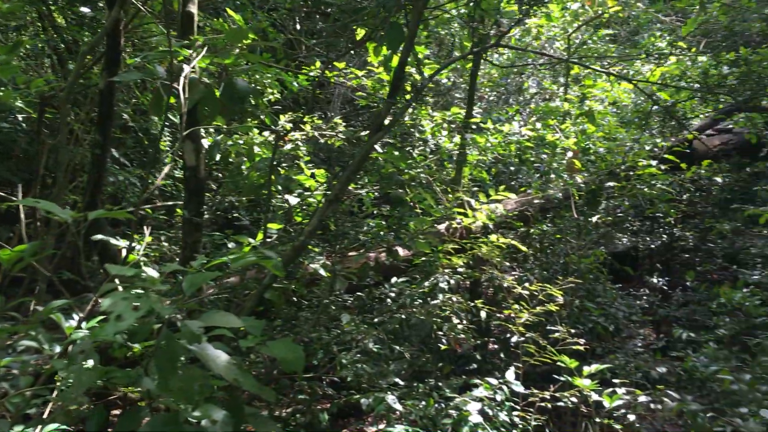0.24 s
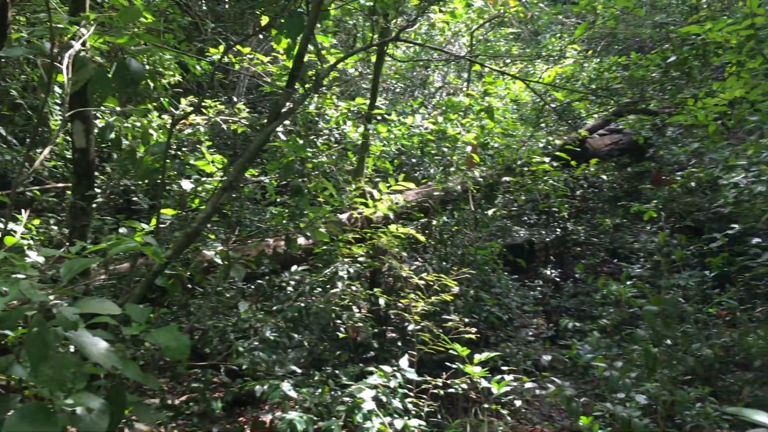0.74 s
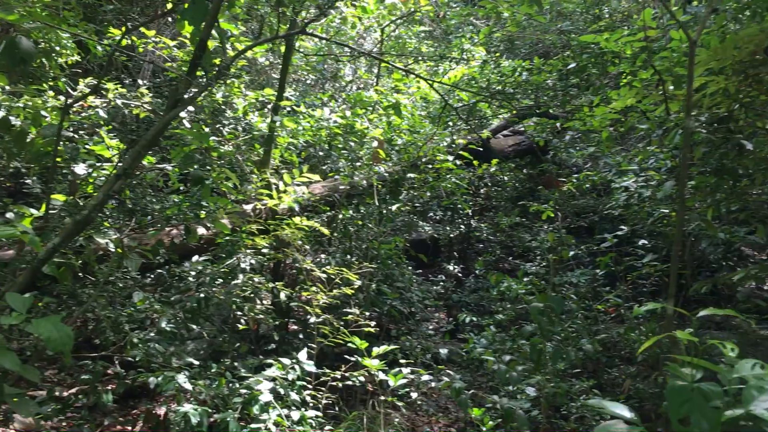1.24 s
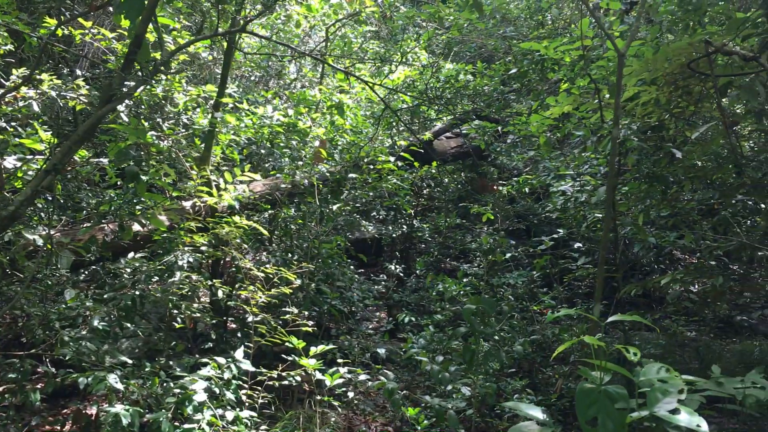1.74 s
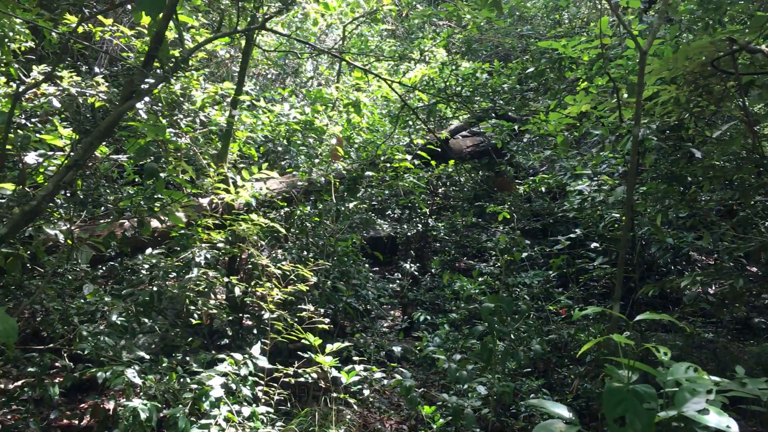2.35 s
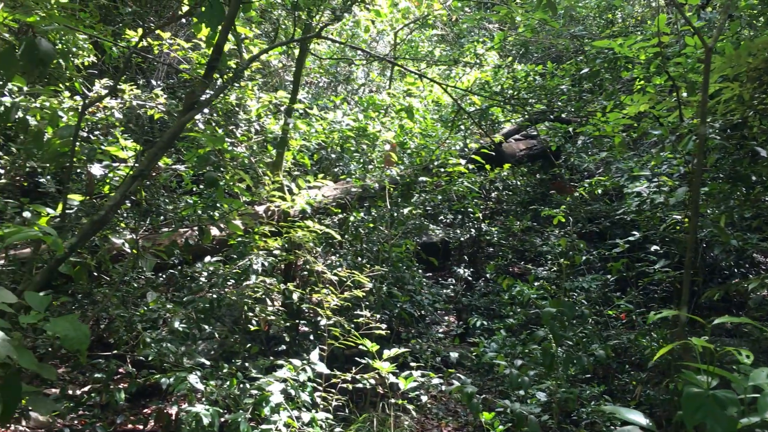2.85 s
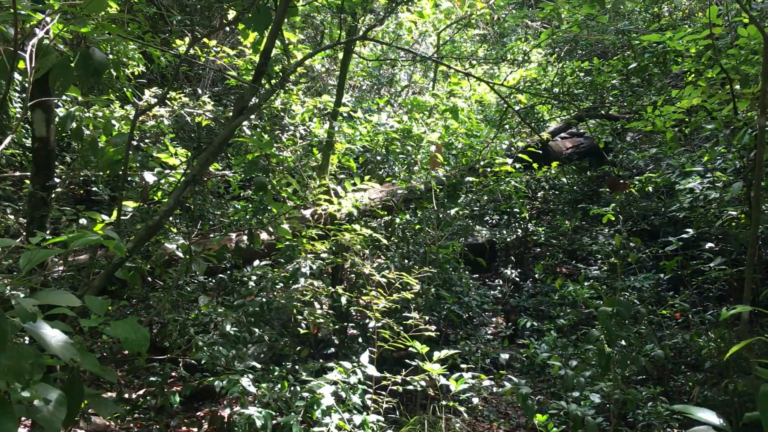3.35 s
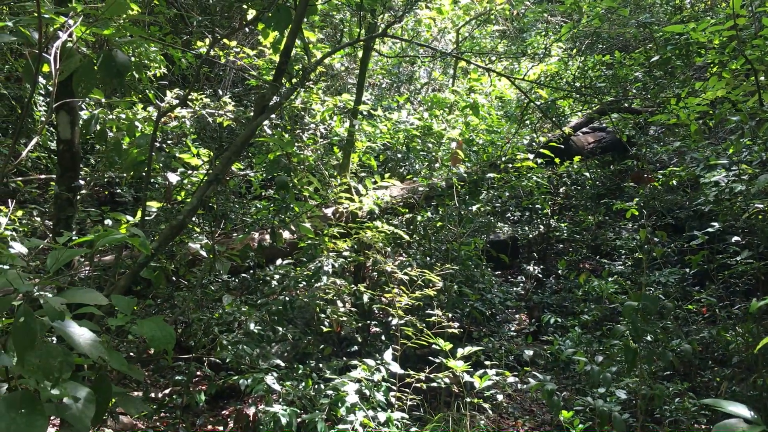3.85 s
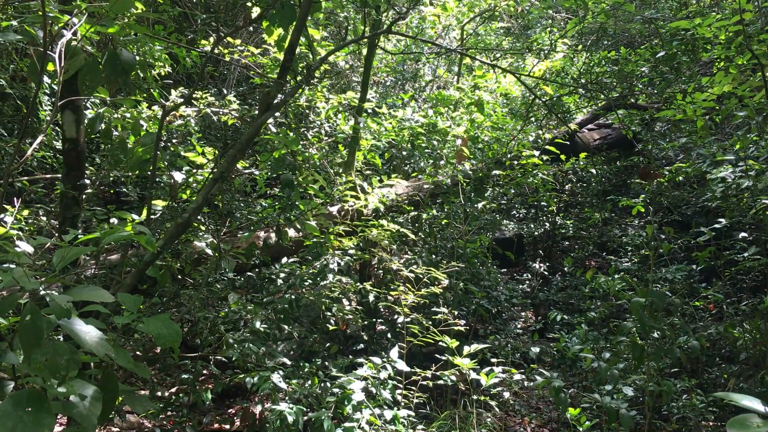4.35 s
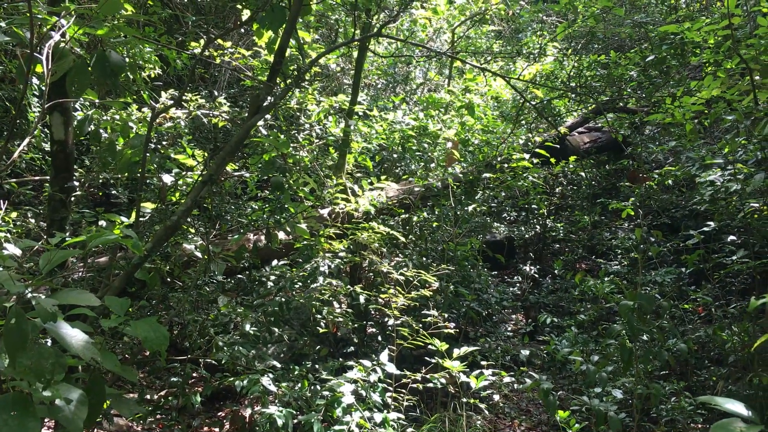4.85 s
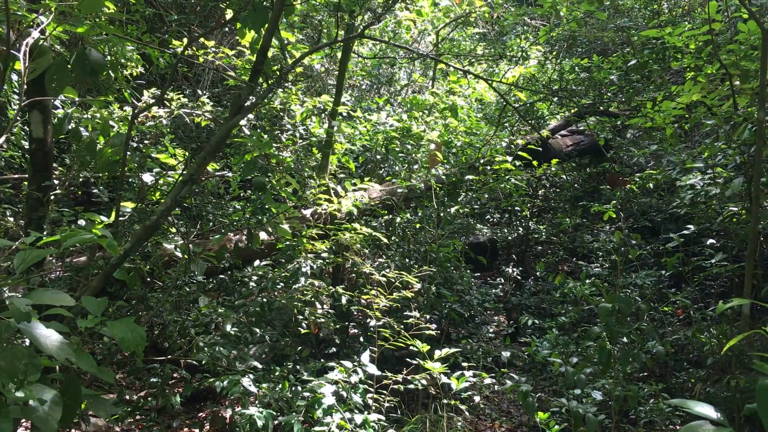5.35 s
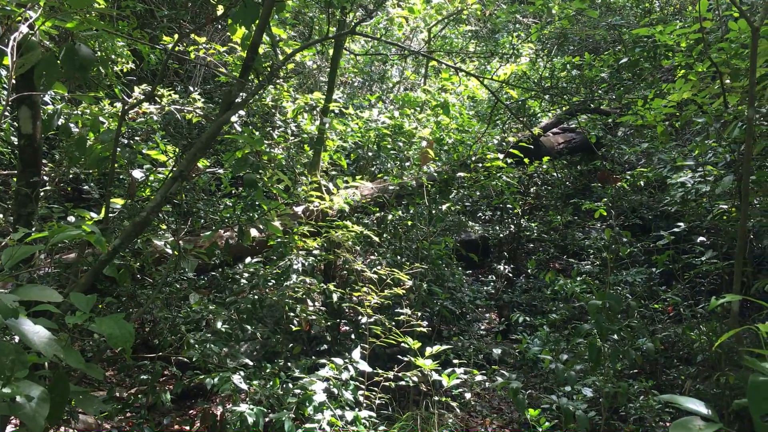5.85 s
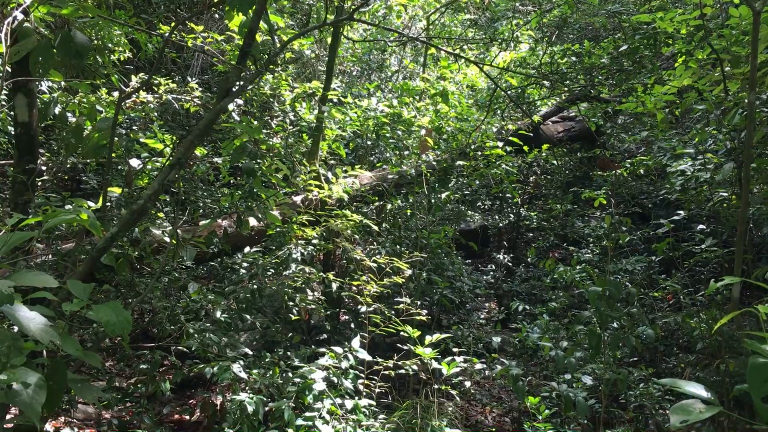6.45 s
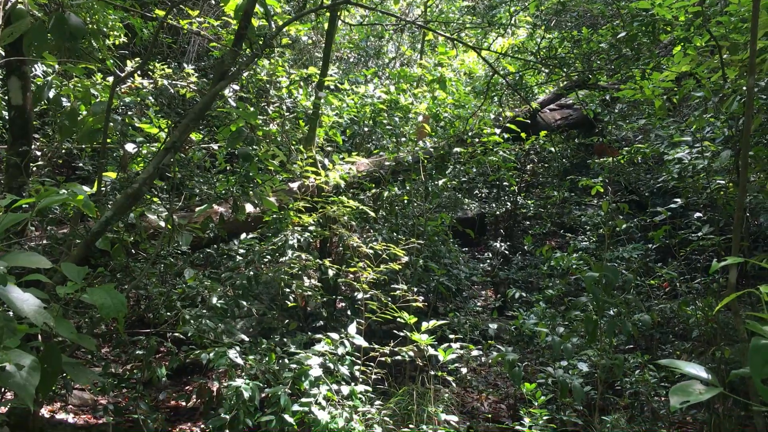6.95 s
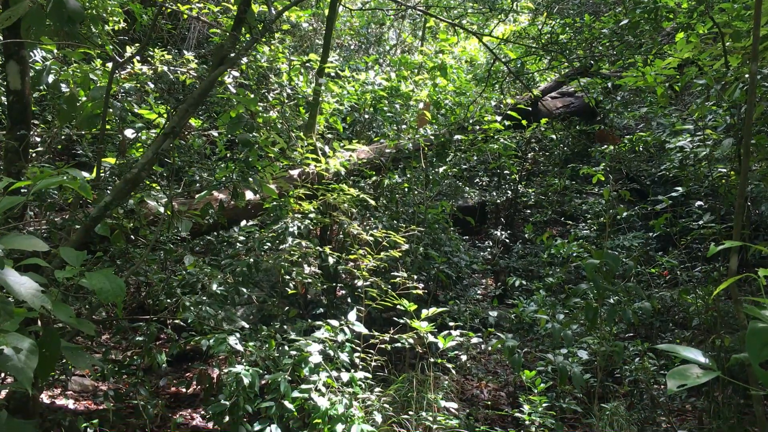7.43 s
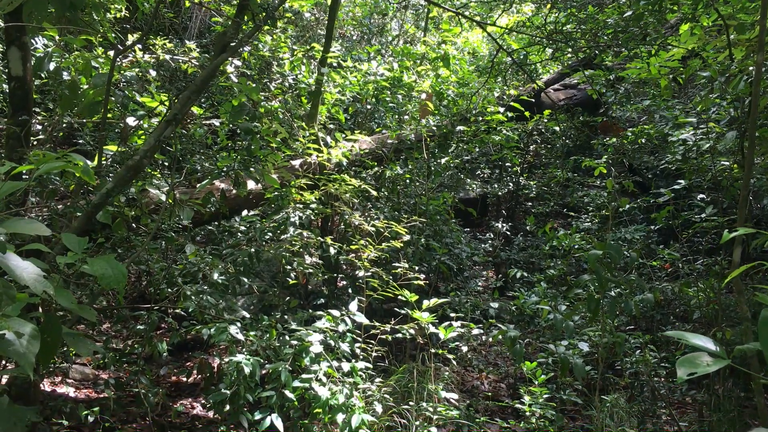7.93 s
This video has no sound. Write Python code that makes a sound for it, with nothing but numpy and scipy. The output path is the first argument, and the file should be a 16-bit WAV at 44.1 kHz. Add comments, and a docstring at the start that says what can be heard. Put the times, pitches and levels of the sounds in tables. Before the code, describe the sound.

In dense sunlit forest, cicadas hold a constant high, fine-grained sizzle with a quick shallow throb. Beneath lie a soft distant roar and low rumble. Faint rasping chips and soft pips from far birds come early, then thin gliding whistles, more frequent toward the end. A few dry twig ticks sound close by. The hand-held mono microphone catches low air buffeting that eases after about two seconds.

```python
"""A forest, heard through a hand-held mono microphone for about eight seconds.
From the start cicadas drone high, some throbbing ten times a second, as click trains through a body spectrum.
Noise bands make the far roar, low rumble, stirring leaves and the air on the microphone, which eases near 1.7 s.
Soon far birds join: rasping noise puffs, soft sine pips, then gliding whistles with an octave; twigs tick nearby.
The octave grows around 5.1 s as the whistling bird turns to face us; the leaves come to rest around 6.6 s."""
import sys
import numpy as np
from scipy import signal
from scipy.fft import rfft, irfft
from scipy.io import wavfile
from scipy.ndimage import uniform_filter1d

SR = 44100
rng = np.random.default_rng(int(sys.argv[2]) if len(sys.argv) > 2 else 0)


def int16_out(signal):
    """Quantize to a 16-bit WAV file."""
    q = np.round(np.clip(np.atleast_2d(signal).T, -1, 1) * 32767)
    wavfile.write(sys.argv[1], SR, q.astype(np.int16))


N = 361179
TIME = np.arange(N) / SR  # s


def undb(db):
    """Decibels to gain."""
    return 10 ** (np.asarray(db) / 20)


def unit(x):
    """Scale to rms 1."""
    return x / np.sqrt(np.mean(x ** 2))


def colour(x, points):
    """Filter x by a response drawn through (f/Hz, level/dB) points, at rms 1."""
    hz, db = np.transpose(points)
    bins = np.maximum(np.arange(N // 2 + 1) * SR / N, 1)
    gain = undb(np.interp(np.log(bins), np.log(hz), db))
    return unit(irfft(rfft(x) * gain, N))


def resonate(x, hz, width_hz):
    """One resonance, gain 1 at its centre."""
    return signal.lfilter(*signal.iirpeak(hz, hz / width_hz, fs=SR), x)


def resonate_twice(x, hz, width_hz):
    """The same resonance twice over, for steeper sides."""
    return resonate(resonate(x, hz, width_hz), hz, width_hz)


def walk(rate):
    """Smooth chance with spread 1 that changes about rate times a second."""
    k = max(int(SR / rate), 1)
    steps = np.repeat(rng.standard_normal(N // k + 1), k)
    smooth = uniform_filter1d(uniform_filter1d(steps, k), k)
    return unit(smooth[:N])


def settle(from_db, to_db, when_s, fade_s):
    """A level in dB that holds, then moves smoothly to its resting value."""
    remaining = (1 - np.tanh((TIME - when_s) / (2 * fade_s))) / 2
    return to_db + (from_db - to_db) * remaining


def add(track, start_s, sound):
    """Mix a sound into the track at its time."""
    i = int(np.clip(start_s * SR, 0, N))
    track[i:i + len(sound)] += sound[:N - i]


def trunks(x, wet_db, t60_s):
    """The direct sound plus a dense, fading scatter from trunks and leaves, at about the same total power."""
    t = np.arange(SR) / SR
    fade = np.exp(-np.log(1000) * t / t60_s)
    onset = 1 - np.exp(-t / 0.0035)
    scatter = rng.standard_normal(SR) * fade * onset
    echo = signal.fftconvolve(x, scatter / np.linalg.norm(scatter))[:N]
    return (x + undb(wet_db) * echo) / np.hypot(1, undb(wet_db))


def tymbal(click_hz, jitter):
    """A cicada's ribbed drum buckles in a fast, uneven train of clicks whose pace drifts."""
    pace = click_hz * np.exp(jitter * (walk(300) + walk(10)))
    turns = np.cumsum(pace) / SR
    return unit(np.diff(np.floor(turns), prepend=0))  # one click a turn


# the cicadas' ringing bodies: f/Hz, relative level/dB
CICADA_RINGING = [(4900, -50), (5400, -17), (5750, -6.5), (6000, -1.5), (6520, 3.5), (7100, -1.5),
                  (7400, -7.5), (7700, -15.5), (8100, -25.5), (9000, -47)]
CICADA_DB, THROB_HZ = -57.5, 10.3


def cicadas(count, click_hz, throb_depth, throb_db, swell_db):
    """Far singers, each scattered along its own path, merge into a sizzle; a nearer group throbs in step."""
    far, near = np.zeros(N), np.zeros(N)
    for _ in range(count):
        far += trunks(tymbal(click_hz * rng.uniform(.7, 1.3), jitter=.1), wet_db=5.0, t60_s=0.49)
    for _ in range(count // 2):
        near += tymbal(click_hz * rng.uniform(.7, 1.3), jitter=.12)
    beat = np.cumsum(THROB_HZ * (1 + 0.034 * walk(2.26))) / SR
    throb = 1 + throb_depth * np.sin(2 * np.pi * beat)
    clicks = unit(far) + undb(throb_db) * throb * unit(near)
    clicks = signal.sosfilt(signal.butter(4, 4000, "high", fs=SR, output="sos"), clicks)
    return colour(clicks, CICADA_RINGING) * undb(CICADA_DB + swell_db * walk(4.4))


# distant roar and fine hiss: f/Hz, relative level/dB per Hz
ROAR_SPECTRUM = [(60, -6.5), (150, -2), (220, -1.5), (340, 1), (500, -2.5), (800, -8.5), (1200, -12),
                 (1800, -17.5), (2600, -20.5), (3500, -23.5), (5200, -26.5), (8500, -34), (11000, -37),
                 (16000, -40)]
ROAR_DB = -56.5


def distant_roar(swell_db):
    """Noise shaped into a far roar and hiss, swelling slightly about twice a second."""
    roar = colour(rng.standard_normal(N), ROAR_SPECTRUM)
    return roar * undb(ROAR_DB + swell_db * walk(2.046))


# steady far rumble: f/Hz, relative level/dB per Hz
RUMBLE_SPECTRUM = [(15, -6), (28, -4.5), (36, -7), (46, -5.5), (54, 1), (61, -8), (73, -10.5), (81, -7.5),
                   (92, -13), (125, -19), (220, -38.5), (500, -63)]
RUMBLE_DB = -50


def far_rumble():
    """Low noise at a steady level, strongest below about 60 Hz."""
    return colour(rng.standard_normal(N), RUMBLE_SPECTRUM) * undb(RUMBLE_DB)


LEAVES_DB, LEAVES_REST_DB, LEAVES_STOP_S, LEAVES_FADE_S = -73.5, -81.5, 6.6, .3


def stirring_leaves(flicker_db):
    """Broadly resonant noise flickers as the leaves stir, then sinks as they come to rest."""
    rustle = unit(resonate_twice(rng.standard_normal(N), hz=2480, width_hz=2600))
    stir_db = settle(LEAVES_DB, LEAVES_REST_DB, LEAVES_STOP_S, LEAVES_FADE_S)
    return rustle * undb(stir_db + flicker_db * walk(15))


# air pressure noise at the microphone: f/Hz, relative level/dB per Hz
AIR_PUSH_SPECTRUM = [(2, -2), (8, 0.5), (18, -5.5), (30, -2), (42, -19.5), (60, -21.5), (100, -31),
                     (300, -76)]
AIR_DB, AIR_REST_DB, SWING_STOP_S, SWING_FADE_S = -39.5, -52, 1.7, 0.59


def air_on_microphone():
    """Very low noise: air pushes on the swinging microphone and eases as it comes to rest."""
    push = colour(rng.standard_normal(N), AIR_PUSH_SPECTRUM)
    return push * undb(settle(AIR_DB, AIR_REST_DB, SWING_STOP_S, SWING_FADE_S))


# short harsh calls of a far bird: centre t/s, f/Hz, level/dB before the puff's envelope and scatter
HARSH_CALLS = [(.195, 2830, -62), (.222, 2380, -59), (0.64, 2520, -63.5), (.797, 2700, -60.5),
               (1.245, 2330, -58), (1.278, 2100, -58), (1.80, 2750, -65), (5.899, 2450, -62.5),
               (6.19, 2500, -63)]


def chips(length_s, width_hz):
    """Brief rasps: a puff of noise through the bird's throat resonance."""
    out = np.zeros(N)
    t = np.arange(SR // 10) / SR
    middle = t.mean()
    puff = np.exp(-((t - middle) / length_s) ** 2)
    for when, hz, db in HARSH_CALLS:
        rasp = unit(resonate_twice(rng.standard_normal(len(t)), hz, width_hz))
        add(out, when - middle, undb(db) * rasp * puff)
    return trunks(out, wet_db=-7, t60_s=0.59)


# pips of a far piping bird, all alike: centre t/s
PIP_TIMES = [.35, 1.07, 1.41, 1.98, 2.24, 2.70, 3.93, 4.30]
PIPE_HZ, PIPE_DB = 2543, -67  # level at each pip's centre, before scatter


def piping(length_s):
    """Soft, rounded sine pips around one slightly trembling pitch."""
    swell = undb(PIPE_DB) * sum(np.exp(-((TIME - when) / length_s) ** 2) for when in PIP_TIMES)
    phase = 2 * np.pi * np.cumsum(PIPE_HZ * (1 + 0.0054 * walk(80))) / SR
    return trunks(np.sqrt(2) * swell * np.sin(phase), wet_db=-2.5, t60_s=0.49)


# far bird whistles, one row a note: start t/s, length t/s, f/Hz it slides towards, start above that f/Hz,
# level/dB before envelope, octave and scatter, roughness (0-1)
WHISTLE_NOTES = [ (0.709, 0.12, 3320, -33, -70, 0.06), (1.254, .1, 3960, -260, -69.5, 0.4),
                 (1.44, .16, 4290, 128, -74, .5), (1.848, .19, 3740, 70, -77.5, 0.16),
                 (2.102, 0.13, 3330, 320, -73.5, 0.46), (2.355, .33, 4460, 329, -69.5, .4),
                 (2.74, 0.077, 4520, -68, -69, .3), (2.871, .11, 4570, 41, -66, 0.57),
                 (3.421, .06, 2885, -210, -64.5, 0.74), (3.518, 0.1, 2190, 28, -65.5, 0.63),
                 (4.051, 0.24, 4155, -60, -67.5, 0.06), (4.25, .1, 5210, -180, -72, .4),
                 (4.428, 0.13, 4424, -200, -67, 0.25), (4.538, 0.055, 2760, -110, -67.5, 0.2),
                 (4.555, .06, 5520, -250, -67, .3), (4.708, 0.13, 4683, -67.5, -57, 0.2),
                 (4.99, 0.13, 2750, 83, -70, .3), (5.11, .095, 5490, -30, -68, 0.3),
                 (5.383, .08, 2530, 230, -70, 0.33), (5.48, .14, 4240, 260, -73, .7),
                 (6.135, .12, 4990, -130, -65, 0.56), (6.358, .11, 4680, 140, -66, .6),
                 (6.52, .11, 4990, -260, -70, 0.4), (6.68, 0.53, 4965, -39, -78, .45),
                 (7.22, .06, 4720, 20, -69, .2), (7.351, 0.19, 4450, 160, -68, 0.14),
                 (7.402, .22, 4900, 128, -68.5, 0.95), (7.535, 0.066, 4560, -150, -67, 1),
                 (7.671, 0.19, 4765, -100, -65.5, 0.28), (7.69, 0.066, 3940, 380, -70, .4),
                 (7.913, 0.19, 4765, 210, -62.5, 0.6), (8.1, .11, 4860, -110, -57.5, 0.2)]
SLIDE_S, CRESCENDO_DB = .07, 0.5  # slide time constant; rise over a note, besides its faded edges
# octave relative to the note's fundamental, before and after the bird turns to face the microphone
OCTAVE_AWAY_DB, OCTAVE_FACING_DB, TURN_S, TURN_FADE_S = -28, -15.5, 5.1, .5


def whistles(waver_hz, edge_s):
    """Gliding notes with a weak octave; the rough ones waver quickly in pitch."""
    out = np.zeros(N)
    wobble = waver_hz * walk(170)
    facing_db = settle(OCTAVE_AWAY_DB, OCTAVE_FACING_DB, TURN_S, TURN_FADE_S)
    for start, length, pitch_hz, slide_hz, db, rough in WHISTLE_NOTES:
        t = np.arange(int(length * SR)) / SR
        glide = pitch_hz + slide_hz * np.exp(-t / SLIDE_S)
        hz = glide + rough * np.interp(start + t, TIME, wobble)
        phase = 2 * np.pi * np.cumsum(hz) / SR
        edges = np.sin(np.pi / 2 * np.clip(np.minimum(t, length - t) / edge_s, 0, 1))
        swell = edges * undb(CRESCENDO_DB * (t / length - .5))
        octave = undb(np.interp(start, TIME, facing_db))  # fixed for the whole note
        tone = np.sin(phase) + octave * np.sin(2 * phase)
        add(out, start, np.sqrt(2) * undb(db) * swell * tone)
    return trunks(out, wet_db=0.5, t60_s=0.81)


# nearby twig ticks: t/s, peak level/dB before scatter, centre f/Hz
TWIG_TICKS = [(.843, -42, 6900), (2.1666, -40, 4470), (3.4902, -48, 6500), (4.743, -45, 3500),
              (4.8145, -45, 5500), (6.1374, -47, 6000), (7.461, -52, 9500)]


def twigs(width_hz):
    """Dry, single snaps, each a push on a heavily damped resonance."""
    out = np.zeros(N)
    push = signal.unit_impulse(SR // 100)
    for when, db, hz in TWIG_TICKS:
        snap = resonate_twice(push, hz, width_hz)
        add(out, when, undb(db) * snap / np.abs(snap).max())
    return trunks(out, wet_db=-7, t60_s=0.22)


def scene():
    """All sources reach both channels alike."""
    forest = cicadas(count=10, click_hz=419.4, throb_depth=0.34, throb_db=-4.5, swell_db=0.26)
    forest += distant_roar(swell_db=0.73) + far_rumble()
    forest += stirring_leaves(flicker_db=1.5) + air_on_microphone()
    forest += chips(length_s=0.008, width_hz=730) + piping(length_s=0.019)
    forest += whistles(waver_hz=114.0, edge_s=0.0065) + twigs(width_hz=5200)
    return np.array([forest, forest])


TOP_HZ = 15750


def record(dry):
    """The recorder cuts the top steeply, with an elliptic low-pass."""
    return signal.sosfilt(signal.ellip(10, .1, 60, TOP_HZ, fs=SR, output="sos"), dry)


dry = scene()
out = record(dry)
int16_out(out)
```